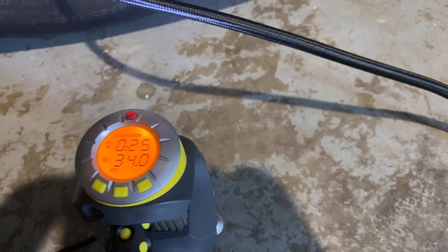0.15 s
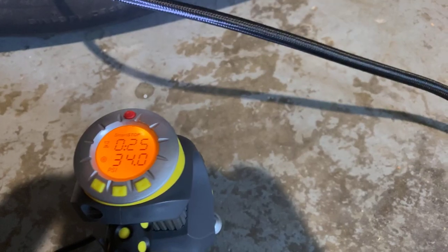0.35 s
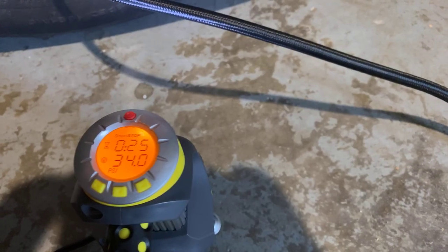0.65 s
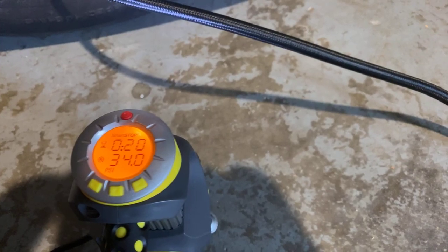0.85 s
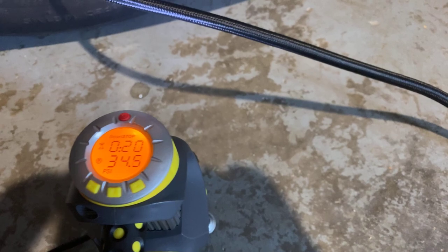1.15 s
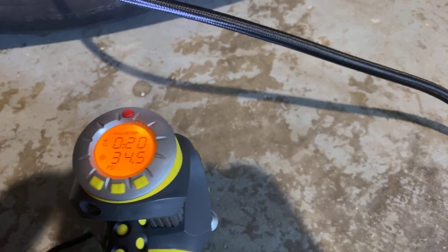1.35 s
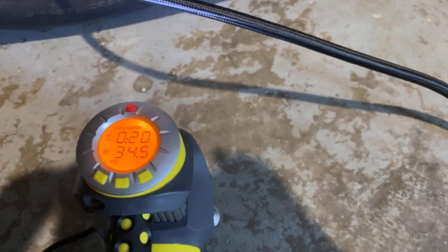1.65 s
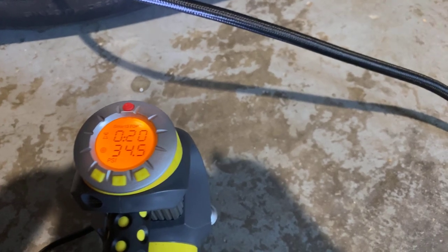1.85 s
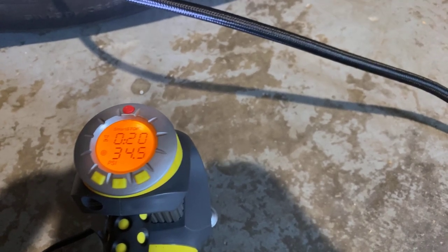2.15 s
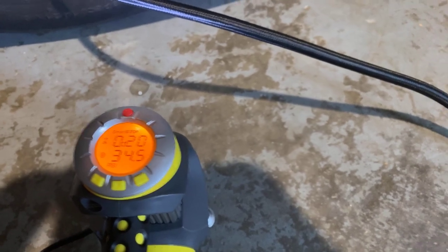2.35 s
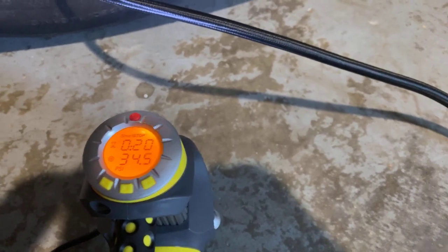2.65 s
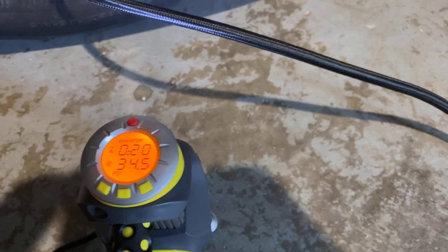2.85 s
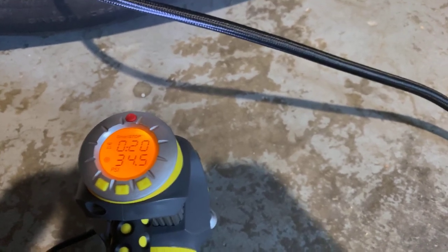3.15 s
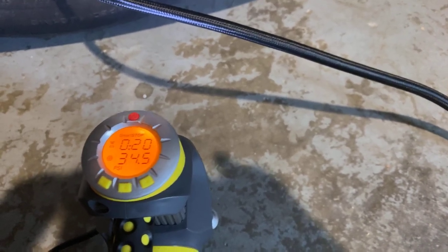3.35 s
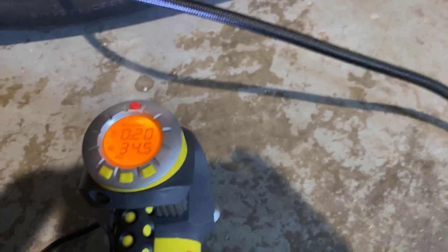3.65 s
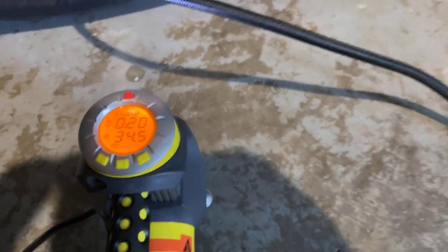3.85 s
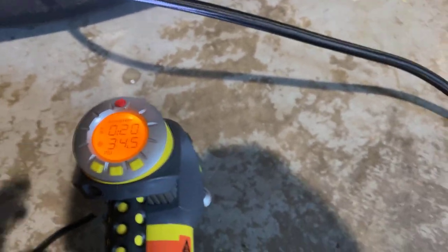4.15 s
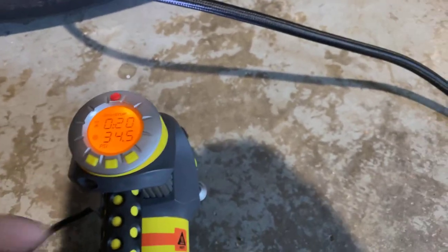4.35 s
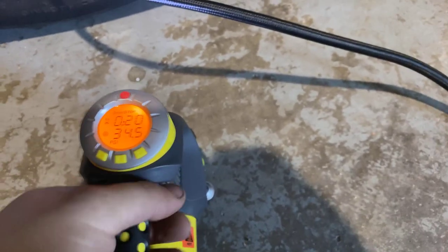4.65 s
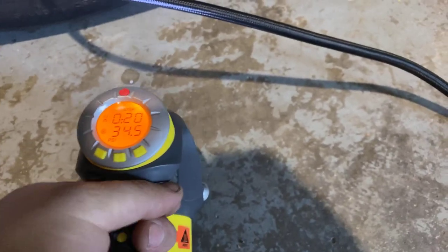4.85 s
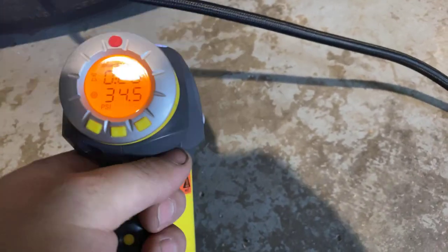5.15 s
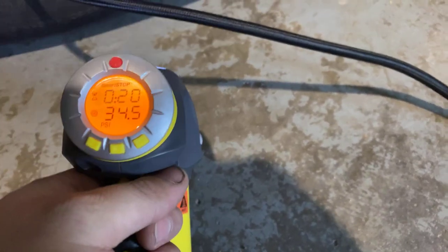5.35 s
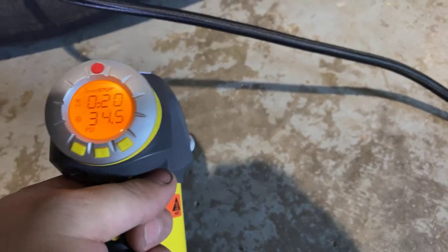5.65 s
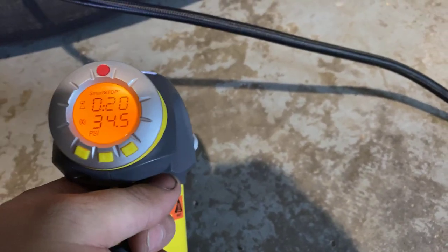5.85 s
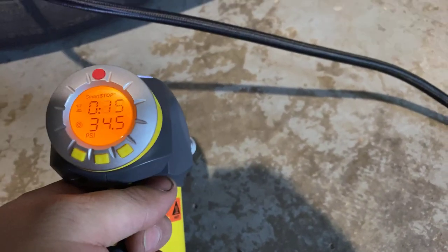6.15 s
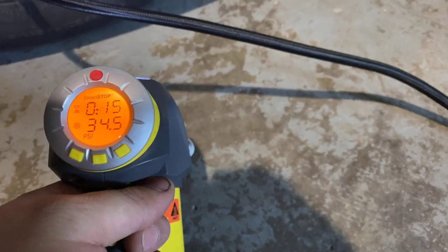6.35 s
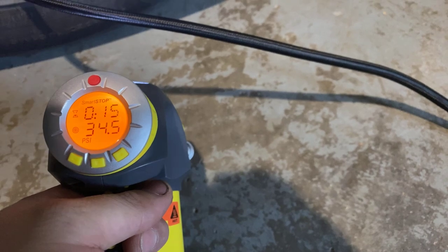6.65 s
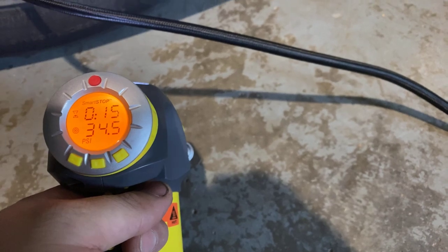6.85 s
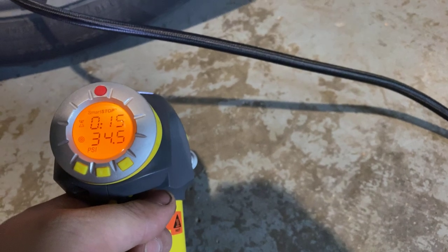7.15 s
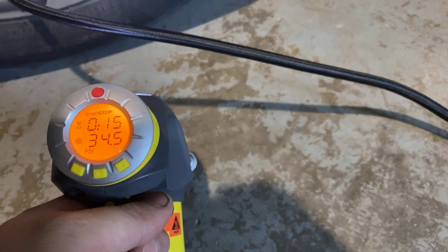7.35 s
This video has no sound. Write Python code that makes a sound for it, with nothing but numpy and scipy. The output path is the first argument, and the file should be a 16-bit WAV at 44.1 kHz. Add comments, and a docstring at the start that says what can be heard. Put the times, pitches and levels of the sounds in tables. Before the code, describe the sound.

A portable tire inflator is already running at the start, close to the microphone, outdoors on concrete beside a car. Its piston strokes come so quickly that they merge into a steady, hard buzz whose pitch barely wavers. The buzz combines a hollow throb from the pump body, a fast clatter against the plastic shell, a fine spitting hiss of air and a thin, high metallic ring. At about 4 seconds a hand reaches over the housing, and the sound becomes duller and slightly quieter. Around 5 seconds the hand grips it firmly; the metallic ring swells briefly and then recedes, and a little of the clatter returns with a changed tone. The pump keeps running at the same speed through to the end at about 7.5 seconds. A faint low hum and a dull, even outdoor background lie underneath throughout.

```python
"""On concrete beside a car, a portable tire inflator buzzes close to the microphone.
Its piston makes about 53 strokes a second. Each thumps the pump body, knocks crank and valves
against the plastic shell, spits air through the ports and rings a metal part.
From about 4 s a hand reaches in and grips the housing, which dulls the clatter.
A low hum and a dull outdoor background lie underneath."""
import sys
import numpy as np
from scipy import signal
from scipy.fft import rfft, irfft, next_fast_len
from scipy.io import wavfile
from scipy.ndimage import uniform_filter1d

SR = 44100
rng = np.random.default_rng(int(sys.argv[2]) if len(sys.argv) > 2 else 0)


def wav_out(sig):
    """Save sig, one row per channel (or a flat mono array), as 16-bit PCM at SR to the path in sys.argv[1]."""
    wavfile.write(sys.argv[1], SR, np.round(np.clip(np.atleast_2d(sig).T, -1, 1) * 32767).astype(np.int16))


N = 331191
TIME_S = np.arange(N) / SR

# crank speed: time_s, stroke_rate_hz
CRANK_SPEED = [(0.0, 52.815), (0.45, 52.886), (0.6, 52.78), (1.8, 53.304), (2.25, 53.159), (2.4, 52.968),
               (3.0, 53.445), (3.3, 53.369), (3.75, 53.053), (4.2, 52.948), (4.35, 53.011), (5.4, 52.865),
               (6.3, 53.123), (6.9, 53.135), (7.05, 53.003), (7.5, 52.847)]
# hand on the housing: time_s, grip (0 free, 0.5 hovering, 1 gripped)
HAND_GRIP = [(0, 0.0056), (3.94, 0.015), (4.15, 0.47), (4.5, 0.43), (5.0, 0.71), (5.1, 0.94), (7.51, 0.98)]
# pump body and air space resonances, relative peaks: pitch_hz, width_hz, free_db, hover_db, gripped_db
BODY_MODES = [(48.1, 17, -15.5, -14.5, -15), (113.7, 23, -16.5, -15.5, -15.5),
              (242, 117, -18.5, -16, -20.5), (334, 185, -16, -15.5, -13.5), (398.6, 88, -11, -9, -10.5),
              (643, 173, -13, -14.5, -16.5), (703.6, 54.4, -0.5, -0.5, -4.5), (761, 31.1, -0.5, -4.5, -1),
              (830.1, 68.7, 1.5, 0.5, 1.5), (947, 101, -28.5, -20.5, -14.5)]
# plastic shell resonances, relative peaks: pitch_hz, width_hz, free_db, hover_db, gripped_db
SHELL_MODES = [(1238, 320, -3.5, -13, -6.5), (1452, 108, 6.5, 1, -4), (1561, 270, -24, -7.5, 0.5),
               (1728, 37.5, 0.5, -2, 1.5), (1848, 80, -3.5, -19, -9), (1970, 24, 0, -2, 6.5),
               (2296, 98, 2.5, -5, -10), (2405, 155, -4, -8, -25), (2766, 190, -5, -12, -12),
               (3147, 183, -1, -13.5, -17.5), (3496, 87, -12, -37, -33), (3658, 102, -14.5, -17, -21),
               (4057, 133, -10, -17.5, -15.5)]
# valve port and vent resonances, relative peaks: pitch_hz, width_hz, free_db, hover_db, gripped_db
PORT_MODES = [(4570, 3900, -14.5, -11, -20), (4920, 140, -5, -2, 0), (5480, 440, -5.5, -15, 1),
              (5844, 200, -10, -3, -2.5), (6384, 280, -8, -8, -5.5), (7220, 410, -6.5, -10, -10),
              (7900, 980, -6, -9, -11.5), (9470, 650, -14.5, -27, -28), (10740, 1900, -24, -22, -16),
              (11200, 1600, -12.5, -17, -25), (12486.0, 520, -16, -16, -7.7), (13600, 1270, -1.5, -9, -6),
              (14370, 950, -1.5, -12, -14), (15300, 1147.0, -40.9, -12, -15)]
# pressure pulses within a stroke: start_s, signed_force
STROKE_PULSES = [(0, 1), (.0066, .21)]
# crank and valve knocks within a stroke: start_s, signed_force
STROKE_KNOCKS = [(.00069, .29), (.00209, 1), (.00444, .96), (.00654, -.3)]
# air spurts within a stroke: start_s, relative_db
STROKE_SPURTS = [(.0006, -8.5), (.0026, -4), (.0046, -0.5), (.0058, -7.5), (.007, -3.5)]
# hum lines: harmonic, rms_db
HUM_LINES = [(2, -67), (4, -45), (5, -52), (8, -65)]
# outdoor noise spectrum: frequency_hz, relative_db
OUTDOOR_SPECTRUM = [(15, -13), (50, -6), (110, -11), (300, -10), (1000, -7), (4000, -25.5), (16000, -37.5)]
# gain of each pump voice by hand pose: free_db, hover_db, gripped_db
THUMP_GAINS = (-18.5, -20.5, -20.5)
CLATTER_GAINS = (-31, -39.5, -36)
AIR_GAINS = (-43, -48.5, -45)
METAL_GAINS = (-40, -46, -53)


def piston_thump(starts_s, grip, rush_db=-28, decay_s=0.0054, leak=0.58, hollow_hz=274, width_hz=190):
    """Pressure pulses and a little rushing air boom in the pump body."""
    pulses = sum(force * impacts(starts_s + at_s, jitter_s=6e-6, spread_db=0.08)
                 for at_s, force in STROKE_PULSES)
    rush = (leak + decay(pulses, decay_s)) * rng.standard_normal(N)
    drive = unit_rms(pulses) + from_db(rush_db) * unit_rms(rush)
    hollow = signal.lfilter(*signal.iirpeak(hollow_hz, hollow_hz / width_hz, fs=SR), drive)
    delayed = drive - 2 * hollow  # all-pass: air swinging in the housing delays the boom
    return resonate(delayed, BODY_MODES, grip)


def shell_clatter(starts_s, grip, rush_db=-6.0, treble=0.66):
    """Crank and valves knock on the shell; a thin, bright rush of air shakes it too."""
    knocks = sum(force * impacts(starts_s + at_s, jitter_s=5e-6) for at_s, force in STROKE_KNOCKS)
    rush = np.diff(turbulence(starts_s, decay_s=0.00052, leak=0.41), prepend=0)
    knocks = nearby_reflections(knocks, wet=0.99, decay_s=0.003)
    drive = unit_rms(knocks) + from_db(rush_db) * unit_rms(rush)
    radiated = drive - treble * np.roll(drive, 1)  # a small shell radiates treble best
    return resonate(radiated, SHELL_MODES, grip)


def valve_air(starts_s, grip, tick_db=-3, highpass_hz=4000):
    """Air spits through the ports and reeds tick shut; small ports radiate only treble."""
    ticks = sum(from_db(db) * impacts(starts_s + at_s, jitter_s=1e-5) for at_s, db in STROKE_SPURTS)
    rush = turbulence(starts_s, decay_s=0.00089, leak=0.15)
    drive = nearby_reflections(rush + from_db(tick_db) * unit_rms(ticks), wet=0.47, decay_s=0.0048)
    hiss = resonate(drive, PORT_MODES, grip)
    highpass = signal.butter(4, highpass_hz, "high", fs=SR, output="sos")
    return unit_rms(signal.sosfilt(highpass, hiss))


def metal_ring(starts_s, pitch_hz=3305, width_hz=60, clasp_s=5.2, clasp_db=8, fade_db_per_s=0.3):
    """A metal part, likely the cylinder, rings each stroke; it recedes, swelling as the hand clasps."""
    strikes = unit_rms(impacts(starts_s + STROKE_KNOCKS[1][0], jitter_s=5e-6))
    drive = strikes + 0.35 * rng.standard_normal(N)
    pole = np.exp((2j * np.pi * pitch_hz - np.pi * width_hz) / SR)
    tone = signal.lfilter([1], [1, -pole], drive).imag
    swell_db = clasp_db * np.exp(-((TIME_S - clasp_s) / 0.11) ** 2)
    return from_db(swell_db - fade_db_per_s * TIME_S) * unit_rms(tone)


def crank_strokes(jitter_s=14e-6, first_turns=0.169):
    """Start time of each stroke; gear play makes it slightly early or late."""
    turns = np.cumsum(curve(CRANK_SPEED)) / SR - first_turns
    starts_s = np.interp(np.arange(np.ceil(turns[-1])), turns, TIME_S)
    return starts_s + jitter_s * rng.standard_normal(len(starts_s))


def impacts(starts_s, jitter_s, spread_db=0.45, half_taps=8):
    """One band-limited click a stroke, varying in time and force."""
    late, strong = rng.standard_normal((len(starts_s), 2)).T
    centres = (starts_s + jitter_s * late)[:, None] * SR
    taps = np.floor(centres).astype(int) + np.arange(-half_taps, half_taps + 1)
    offsets = taps - centres
    clicks = from_db(spread_db * strong)[:, None] * np.sinc(offsets) * np.sinc(offsets / (half_taps + 1))
    inside = (taps >= 0) & (taps < N)
    return np.bincount(taps[inside], clicks[inside], N)


def turbulence(starts_s, decay_s, leak):
    """Noise leaps at each air spurt and dies to a steady leak."""
    spurts = sum(from_db(db) * impacts(starts_s + at_s, jitter_s=5e-5) for at_s, db in STROKE_SPURTS)
    return unit_rms((decay(spurts, decay_s) + leak) * rng.standard_normal(N))


def resonate(drive, modes, grip, size=8192):
    """Resonances ring; their peaks crossfade between the three hand poses."""
    pitch_hz, width_hz, *poses_db = np.transpose(modes)[:, :, None]
    hz = abs(np.fft.fftfreq(size, 1 / SR))
    peaks = 1 / (1 + (2 * (hz - pitch_hz) / width_hz) ** 2)
    ringing = np.zeros(N)
    for pose, peaks_db in enumerate(poses_db):
        gain = np.linalg.norm(peaks * from_db(peaks_db), axis=0)
        log_gain = np.log(np.maximum(gain, gain.max() * 1e-4))
        minimum_phase = np.exp(np.conj(signal.hilbert(log_gain)))
        response = np.fft.ifft(minimum_phase).real[:size // 2]
        share = np.maximum(1 - abs(2 * grip - pose), 0)
        ringing += share * unit_rms(signal.oaconvolve(drive, response)[:N])
    return ringing


def nearby_reflections(x, wet, decay_s, smooth_hz=260, size=2048):
    """Dense short reflections comb the sound finely but keep its broad colour."""
    tail = rng.standard_normal(size) * np.exp(-np.arange(size) / (decay_s * SR))
    length = next_fast_len(N + size)
    comb = 1 + wet * rfft(tail / np.linalg.norm(tail), length)
    broad = np.sqrt(uniform_filter1d(abs(comb) ** 2, round(smooth_hz * length / SR)))
    return irfft(rfft(x, length) * comb / broad, length)[:N]


def hand_gain(gains_db, grip):
    """The hand shades a voice according to its pose."""
    return from_db(np.interp(grip, [0, 0.5, 1], gains_db))


def low_hum(base_hz=17.55, waver=0.0084, waver_hz=1.9):
    """Low harmonics waver together, probably an engine idling nearby."""
    slow_band = np.fft.rfftfreq(N, 1 / SR) < waver_hz
    turns = np.cumsum(base_hz * (1 + waver * shaped_noise(slow_band))) / SR
    return sum(from_db(db) * np.sqrt(2) * np.sin(2 * np.pi * (harmonic * turns + rng.random()))
               for harmonic, db in HUM_LINES)


def outdoor_background(rms_db=-42):
    """Steady, dull outdoor noise."""
    hz, db = np.transpose(OUTDOOR_SPECTRUM)
    spectrum_db = np.interp(np.log(np.fft.rfftfreq(N, 1 / SR) + 1), np.log(hz), db)
    return from_db(rms_db) * shaped_noise(from_db(spectrum_db))


def shaped_noise(bin_gains):
    return unit_rms(irfft(rfft(rng.standard_normal(N)) * bin_gains, N))


def decay(x, decay_s):
    return signal.lfilter([1], [1, -np.exp(-1 / (decay_s * SR))], x)


def curve(rows):
    return np.interp(TIME_S, *np.transpose(rows))


def from_db(db):
    return 10 ** (np.asarray(db) / 20)


def unit_rms(x):
    return x / np.sqrt(np.mean(x ** 2) + 1e-20)


def scene():
    """Four pump voices share one crank and one hand, over hum and outdoor noise."""
    starts_s, grip = crank_strokes(), curve(HAND_GRIP)
    pump = hand_gain(THUMP_GAINS, grip) * piston_thump(starts_s, grip)
    pump += hand_gain(CLATTER_GAINS, grip) * shell_clatter(starts_s, grip)
    pump += hand_gain(AIR_GAINS, grip) * valve_air(starts_s, grip)
    pump += hand_gain(METAL_GAINS, grip) * metal_ring(starts_s)
    return (pump + low_hum() + outdoor_background())[None]


def record(dry):
    """The microphone sheds the deepest bass; a low-pass limits the treble."""
    highpass_hz, lowpass_hz = 12, 15900
    highpass = signal.butter(1, highpass_hz, "high", fs=SR, output="sos")
    lowpass = signal.firwin(511, lowpass_hz, window=("kaiser", 9), fs=SR)
    return signal.oaconvolve(signal.sosfilt(highpass, dry), lowpass[None], "same")


dry = scene()
out = record(dry)
wav_out(out)
```